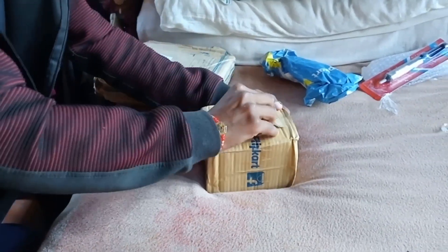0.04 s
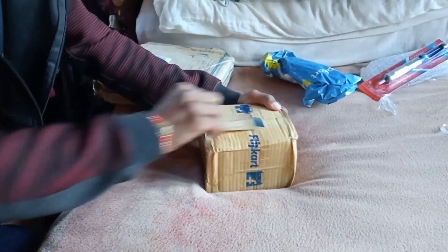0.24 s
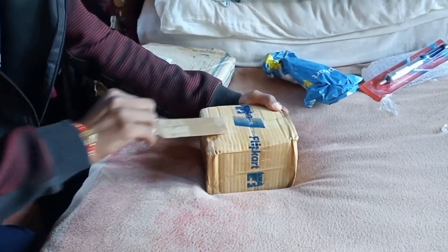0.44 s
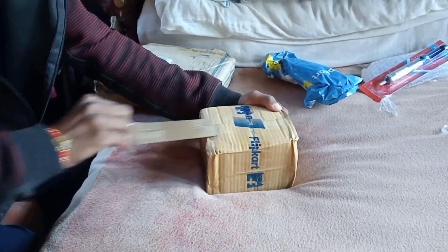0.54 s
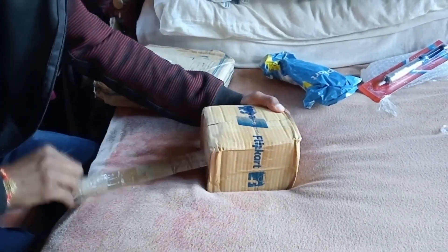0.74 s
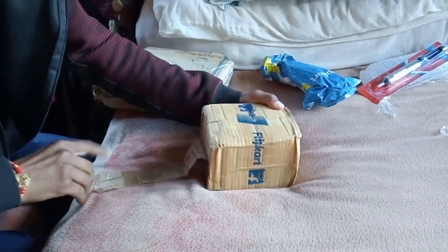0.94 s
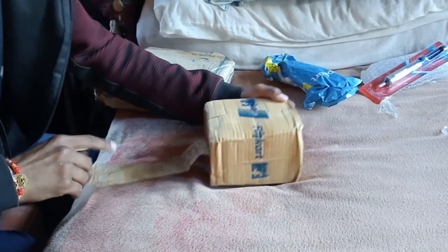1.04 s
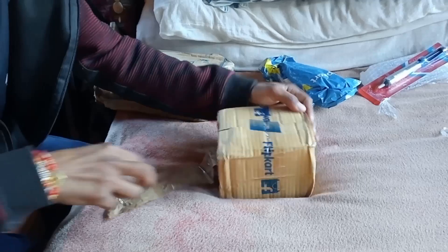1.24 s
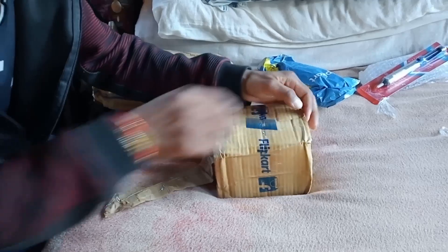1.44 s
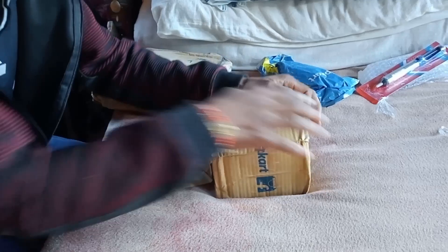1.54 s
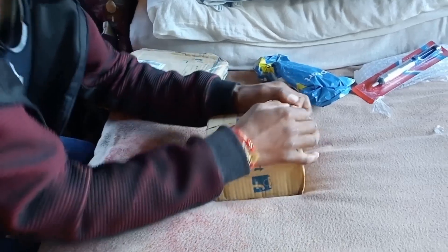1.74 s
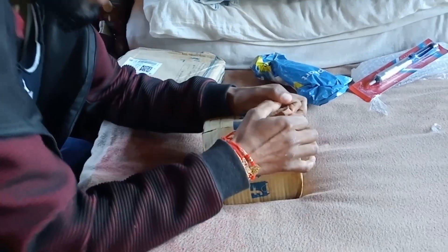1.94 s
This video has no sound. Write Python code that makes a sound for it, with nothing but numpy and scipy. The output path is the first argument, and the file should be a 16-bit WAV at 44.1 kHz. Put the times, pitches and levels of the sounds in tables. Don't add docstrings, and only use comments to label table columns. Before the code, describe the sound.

Packing tape ripped off a small cardboard box in three harsh, crackling jerks, then faint rustles

```python
import sys
import numpy as np
from scipy import signal
from scipy.fft import rfft, irfft
from scipy.io import wavfile
from scipy.ndimage import uniform_filter1d

SR = 44100
rng = np.random.default_rng(int(sys.argv[2]) if len(sys.argv) > 2 else 0)


def decibels_to_gain(level_db):
    exponent = np.asarray(level_db, float) / 20
    return 10 ** exponent


def transcribe(signal):
    frames = np.atleast_2d(signal).T
    limited = np.clip(frames, -1, 1)
    pcm = np.round(limited * 32767).astype(np.int16)
    wavfile.write(sys.argv[1], SR, pcm)


N = 88200


def evened(x):
    return x / np.sqrt(np.mean(x ** 2) + 1e-20)


def colour(x, points):
    f, db = np.transpose(points)
    hz = np.fft.rfftfreq(len(x), 1 / SR)
    curve = np.interp(np.log(hz + 1), np.log(f), db)
    return irfft(rfft(x) * decibels_to_gain(curve), len(x))


def resonate(x, hz, width):
    b, a = signal.iirpeak(min(hz, SR / 2.2), hz / min(width, SR / 3), SR)
    return signal.lfilter(b, a, x)


def peel():
    # time in seconds, crackle level in dB,
    # box drumming in dB relative to the crackle.
    pull = [
        [(0.0, -44, -12), (0.034, -55.5, -2), (0.046, -55, -8), (0.078, -22.5, -26), (0.094, -22, -16.5),
         (0.178, -53, -11.5), (0.195, -57, 13.5)],
        [(0.195, -66, 19), (0.229, -44.5, -8), (0.241, -38.5, -2.5), (0.267, -32, -5), (0.311, -34, -2),
         (0.32, -26.5, -9)],
        [(0.32, -30, -1.5), (0.34, -21, -7.5), (0.412, -18, -6.5), (0.448, -22, -4.5), (0.484, -18, -6.5),
         (0.578, -45, -3.5), (0.6, -53, 6.5)],
        [(0.6, -50, -12), (0.61, -34, -4.5), (0.642, -43.5, 0), (0.664, -43.5, 3), (0.692, -38, -1.5),
         (0.718, -41.5, -2), (0.75, -40, -6.5)],
        [(0.75, -44, -5.5), (0.762, -33.5, -1.5), (0.768, -21, -4), (0.83, -18.5, -0.5), (0.864, -20, -10),
         (0.99, -68, -13), (1.0, -70.5, -23.5)],
    ]
    # frequency in Hz, density in dB per Hz.
    crackle_curve = [(460, -35.5), (820, -6), (1650, -4.5), (3100, -4), (5100, -3), (7400, -1.5),
                     (11200, -1), (16300, -3)]
    # time in seconds, ring in dB.
    ring_curve = [(.08, 0.5), (.3, 1), (.35, 5.5), (.44, 0), (.49, 2), (.62, 3), (.78, -0.5), (.82, -3.5),
                  (.9, -4.5)]
    t = np.arange(N) / SR
    s, db, box_db = np.concatenate(pull).T
    s = np.maximum.accumulate(s)
    level = decibels_to_gain(np.interp(t, s, db, right=-120))

    clump_s, clump_db = 0.0023, -0.5
    wander = uniform_filter1d(rng.standard_normal(N), round(clump_s * SR) + 1)
    clumps = decibels_to_gain(clump_db * evened(wander))

    crackle = grains(slips(per_s=8000, spread_db=2.5) * clumps, t60=0.0059)
    film = patchy(colour(crackle, crackle_curve))
    ring = resonate(film, hz=6850, width=7200)
    film = film + ring * (decibels_to_gain(np.interp(t, *np.transpose(ring_curve))) - 1)

    knocks = resonate(slips(per_s=1700, spread_db=3.0) * clumps, hz=620, width=1700)
    drive = evened(knocks) * level * decibels_to_gain(np.interp(t, s, box_db))
    return film * level + decibels_to_gain(-4) * box(drive) / 4


def slips(per_s, spread_db):
    draw = rng.random(N)
    size = np.minimum(rng.exponential(1, N), 5)
    clicks = rng.choice([-1., 1.], N) * decibels_to_gain(spread_db * size)
    return evened(clicks * (draw < per_s / SR))


def grains(clicks, t60, count=16):
    noise = rng.standard_normal((count, 600))
    kind = rng.integers(0, count, N)
    fade = decibels_to_gain(-60 * np.arange(noise.shape[1]) / SR / t60)
    out = np.zeros(N)
    for k, hz in enumerate(np.geomspace(800, 14000, count)):
        pitched = evened(resonate(noise[k], hz, 0.73 * hz))
        burst = evened(0.76 * noise[k] + pitched) * fade
        out += signal.oaconvolve(clicks * (kind == k), burst)[:N]
    return evened(out)


def patchy(x):
    patch_db, patch_frames, patch_bins = 1.5, 14, 4
    z = signal.stft(x, nperseg=256, noverlap=192)[2]
    patch = uniform_filter1d(rng.standard_normal(z.T.shape), patch_frames, 0)
    patch = uniform_filter1d(patch, patch_bins, 1)
    z = z * decibels_to_gain(patch_db * evened(patch).T)
    return evened(signal.istft(z, nperseg=256, noverlap=192)[1][:N])


def box(drive):
    # mode frequency in Hz, width in Hz, level in dB.
    modes = [(111.1, 31, -8.5), (153, 10, -10), (193.5, 26, -10), (259.6, 41, -10), (328, 70, -6.5),
             (441.4, 28, -9), (528, 55, -11), (648, 32, -16), (734.4, 54, -13.5), (1100, 350, -4.5),
             (1618, 60, -5), (2430, 53, -8)]
    max_q = 24
    out = np.zeros(len(drive))
    for k, (hz, width, db) in enumerate(modes):
        width = max(width, hz / max_q)
        mode = resonate(resonate(drive, hz, width), hz, 3 * width)
        out += (-1) ** k * decibels_to_gain(db) * mode / np.sqrt(width / SR)
    return out


def damped_rings(strikes):
    out, t = np.zeros(N + 3000), np.arange(3000) / SR
    for s, db, hz, t60 in strikes:
        rough = rng.standard_normal(3000)
        edge = resonate(resonate(rough, hz, hz), hz, 1.1 * hz) / np.sqrt(hz / 8000)
        ring = np.sin(2 * np.pi * hz * t) + 1.02 * edge
        rise = np.minimum(t / 0.00023, 1)
        out[round(s * SR):][:3000] += ring * decibels_to_gain(db - 60 * t / t60) * rise
    return out[:N]


def more_snaps():
    # start in seconds, peak level in dB, pitch in Hz, t60 in seconds.
    more_strikes = [(0.073, -15.5, 6900, 0.016), (0.084, -22, 8800, .015), (0.3244, -23.5, 4770, 0.055),
                    (0.335, -16.5, 5150, 0.015), (0.3395, -17, 6950, 0.052), (0.355, -17.5, 5840, .02),
                    (0.373, -13, 5180, 0.014), (.378, -13, 7220, 0.018), (0.3905, -13.5, 6390, 0.012),
                    (0.391, -16, 2300, .012), (0.404, -19, 6200, 0.017), (0.415, -14, 7200, .02),
                    (0.412, -21, 1600, 0.019), (.435, -22.5, 3300, 0.01016), (0.453, -9.5, 7000, .005),
                    (0.455, -23.5, 5470, 0.013), (0.4794, -12, 7030, 0.012), (0.486, -17, 7170, 0.022),
                    (0.486, -20, 5250, 0.076), (.501, -19.5, 5450, 0.016), (0.7569, -22, 1978, 0.0061),
                    (0.77, -23.5, 1810, .012), (.764, -25, 6000, .006), (.7705, -9, 9000, 0.0057),
                    (.7715, -13.5, 5000, 0.0088), (0.79, -18, 5330, .02), (.791, -17.5, 7000, 0.013),
                    (.796, -14, 8100, 0.013), (0.806, -19, 3140, .02), (.833, -20, 5330, 0.02),
                    (0.845, -21.5, 4470, 0.03), (.854, -21.5, 3530, .03)]
    return damped_rings(more_strikes)


def jolts():
    # start in seconds, peak level in dB, pitch in Hz, t60 in seconds.
    booms = [(0.07, -34.5, 312, 0.13), (0.075, -9, 151, 0.014), (0.241, -30.5, 238.3, 0.18),
             (0.274, -27, 225, 0.063), (.455, -16, 328, 0.092), (0.477, -16, 324.6, 0.082),
             (0.485, -41, 152, 0.11), (0.601, -28, 318, 0.17), (.668, -24.5, 305, 0.069),
             (0.763, -18, 328, 0.13), (.806, -19, 314.5, 0.13), (0.81, -18.5, 153, 0.14),
             (.818, -13, 528, 0.16), (0.827, -29, 106, 0.15), (0.8134, -13.5, 2470, 0.021),
             (.823, -11, 1870, 0.013), (0.811, 0, 202, 0.022), (.794, -15.5, 324, 0.086),
             (0.828, -16, 504, 0.072), (0.339, -18, 259, 0.061), (.44, -13, 1100, 0.028),
             (1.752, -54, 183, 0.23), (1.369, -47, 326, 0.069), (1.39, -64, 220, 0.06),
             (1.408, -56.5, 318, .06), (1.601, -45.5, 440, 0.046), (1.618, -50.5, 300, 0.039),
             (1.728, -43, 320, 0.039), (1.747, -48, 100.7, .15), (1.868, -43, 107, 0.079),
             (1.87, -41, 202, 0.058), (1.942, -57, 294, 0.037), (1.929, -48, 234, 0.099)]
    rise_cycles = 1.74
    out, t = np.zeros(N + SR), np.arange(0, .2, 1 / SR)
    for s, db, hz, t60 in booms:
        rise = np.minimum(t * hz / rise_cycles, 1)
        out[round(s * SR):][:len(t)] += rise * decibels_to_gain(db - 60 * t / t60) * np.sin(2 * np.pi * hz * t)
    return out[:N]


def snaps():
    # start in seconds, peak level in dB, pitch in Hz, t60 in seconds.
    taps = [(0.0492, -33, 8800, 0.016), (0.0586, -40, 6640, 0.0023), (0.3243, -18.5, 9060, 0.014),
            (0.609, -22.5, 1137, 0.023), (0.245, -39.5, 1625, 0.16), (0.758, -23.5, 5600, 0.0061),
            (0.7708, -10, 6960, 0.0058), (0.996, -44, 11100, 0.0068), (1.228, -58, 12100, 0.013),
            (1.0239, -29.5, 5500, 0.0034), (1.023, -42, 8900, 0.0081), (1.034, -37, 5840, 0.0043),
            (1.0365, -35, 8800, 0.007), (1.043, -32, 5130, 0.0045), (1.0609, -32, 2420, .008),
            (1.0609, -37.5, 1310, 0.0092), (1.061, -37, 8500, .006), (1.07, -38, 6060, .005),
            (1.073, -28.5, 7540, 0.0061), (1.0806, -28, 5500, 0.0028), (1.328, -41, 1100, 0.012),
            (1.328, -39, 2300, 0.017), (1.33, -36, 6400, 0.0091), (1.339, -37.5, 2280, 0.017),
            (1.341, -39.5, 6050, 0.013), (1.345, -37, 6300, .004), (1.103, -59, 600, 0.0078),
            (1.348, -25, 6000, 0.0036), (1.365, -34.5, 5800, 0.0015), (1.467, -34.5, 1680, 0.018),
            (1.466, -44, 3000, 0.0067), (1.464, -46, 1100, 0.0071), (1.4693, -42, 1900, 0.015),
            (1.4733, -43.5, 2970, 0.0031), (1.8656, -38.5, 2130, .02), (1.866, -52, 3470, 0.019),
            (1.87, -34.5, 1240, 0.0095), (1.878, -38.5, 2300, 0.016), (1.883, -39.5, 3500, .02),
            (1.9242, -41, 930, 0.014), (1.923, -44, 1800, .01), (1.942, -38, 1630, 0.0063),
            (1.941, -40, 900, .01), (1.96, -38.5, 2290, .015), (1.961, -40, 3140, 0.01),
            (1.977, -43.5, 2450, .015), (1.985, -45, 3340, .015)]
    return damped_rings(taps)


def handling():
    # start in seconds, length in seconds, crackle in dB, crackle centre in Hz, box in dB.
    grips = [(0.997, 0.022, -67.5, 8040, -87), (1.0237, 0.013, -53.5, 6600, -75),
             (1.054, 0.015, -52.5, 6470, -77), (1.072, 0.039, -64.5, 3140, -57),
             (1.176, 0.016, -79, 7850, -79.5), (1.321, 0.035, -55, 5200, -56),
             (1.356, 0.01, -63.5, 5000, -58), (1.385, 0.025, -54.5, 7700, -55.5),
             (1.587, 0.027, -92, 3060, -59.5), (1.723, 0.06, -68.5, 6400, -53),
             (1.858, 0.036, -60, 5000, -43.5), (1.926, 0.018, -57.5, 2920, -44),
             (1.952, .078, -60, 3930, -63)]
    grip_s, let_go_db_per_s = 0.0076, -450
    t, film, drive = np.arange(N) / SR, np.zeros(N), np.zeros(N)
    crinkle = grains(slips(per_s=7000, spread_db=0.5), t60=0.0031)
    wide = evened(np.diff(crinkle, prepend=0) + 5.3 * crinkle)
    knocks = evened(resonate(resonate(slips(2500, 1.5), 330, 600), 330, 900))
    for start, length, db, hz, box_db in grips:
        rise = np.clip((t - start) / grip_s, 0, 1)
        grip = rise * decibels_to_gain(let_go_db_per_s * np.maximum(t - start - length, 0))
        hump = evened(resonate(resonate(wide, hz, hz), hz, hz))
        film += decibels_to_gain(db) * grip * (hump + decibels_to_gain(3.5) * wide)
        drive += decibels_to_gain(box_db - 25) * grip * knocks
    return film + box(drive)


def room(x):
    t60 = .1
    t = np.arange(SR // 3) / SR
    tail = rng.standard_normal(len(t)) * decibels_to_gain(-60 * t / t60) * (t > .003)
    return signal.fftconvolve(x, tail / np.linalg.norm(tail))[:N]


def hush():
    # frequency in Hz, density in dB per Hz.
    hush_curve = [(32, 8.5), (110, 3.5), (280, 0), (750, -10.5), (1950, -7), (4100, -15), (8100, -15.5),
                  (16300, -21.5)]
    swell = decibels_to_gain(1.7 * evened(uniform_filter1d(rng.standard_normal(N), 1500)))
    return decibels_to_gain(-61) * swell * evened(colour(rng.standard_normal(N), hush_curve))


def whine():
    start_s, end_s, start_hz, rise_hz_per_s, width_hz = 1.48, 1.76, 1860, 450, 35
    t = np.arange(N) / SR
    on = np.clip((t - start_s) / .05, 0, 1) * np.clip((end_s - t) / .05, 0, 1)
    waver = signal.lfilter(*signal.butter(2, width_hz, fs=SR), rng.standard_normal(N))
    hz = start_hz + rise_hz_per_s * (t - start_s)
    tone = np.sin(2 * np.pi * np.cumsum(hz) / SR)
    return decibels_to_gain(-71) * on * evened((2 + evened(waver)) * tone)


def scene():
    # start in seconds, end in seconds.
    swings = [
        (.047, .054),
        (.755, .808),
        (1.02, 1.105),
        (1.325, 1.385),
    ]
    t = np.arange(N) / SR
    near = peel() + more_snaps() + jolts() + snaps() + handling()
    mid = near + decibels_to_gain(-14) * room(near) + hush() + whine()
    treble = signal.butter(6, 4500, "high", fs=SR, output="sos")
    side = signal.sosfilt(treble, near + 0.297 * room(near))
    swing = uniform_filter1d(sum(1. * (t > a) * (t < b) for a, b in swings), size=100)
    side = decibels_to_gain(-10) * np.roll(side, 40) * swing
    return np.array([mid + side, mid - side])


def roll_off(x):
    return signal.sosfilt(signal.butter(12, 16620, fs=SR, output="sos"), x)


def record(dry):
    # frequency in Hz, gain in dB.
    mic_curve = [(8900, 0.5), (10700, -7), (12400, -3.5), (16300, -1)]
    heard = np.array([colour(x, mic_curve) for x in dry])
    cut = signal.sosfilt(signal.butter(2, 80, "high", fs=SR, output="sos"), heard)
    band_limit = signal.firwin(511, 15620, window=("kaiser", 9), fs=SR)
    mix = signal.oaconvolve(cut, band_limit[None], "same")
    return roll_off(mix)


dry = scene()
out = record(dry)
transcribe(out)
```